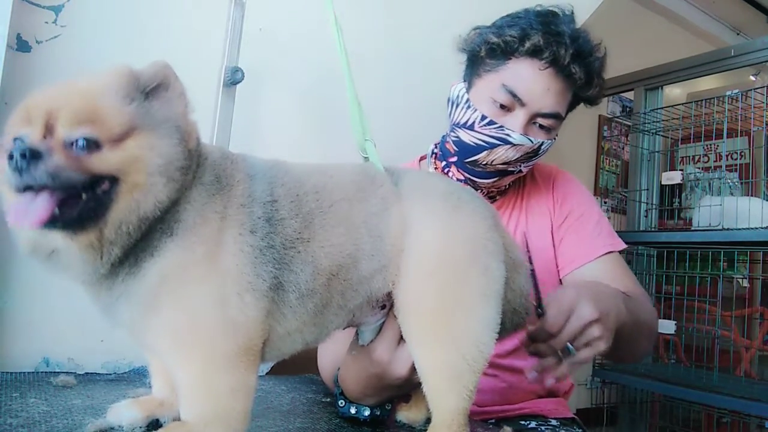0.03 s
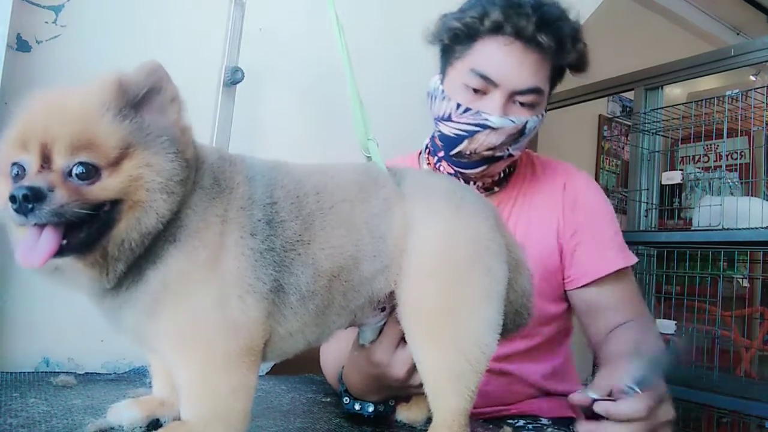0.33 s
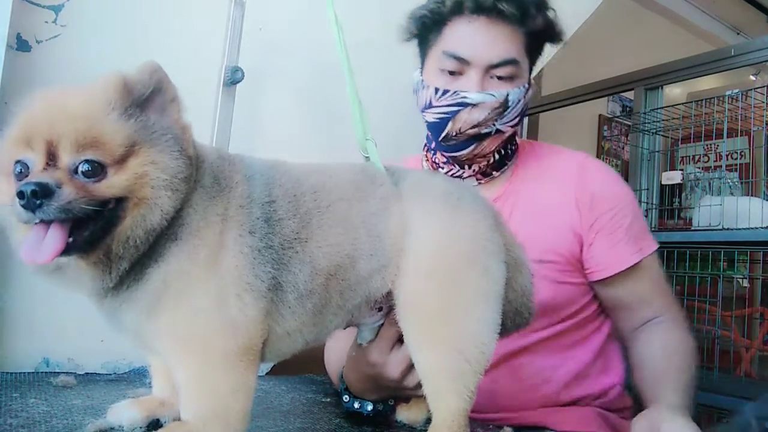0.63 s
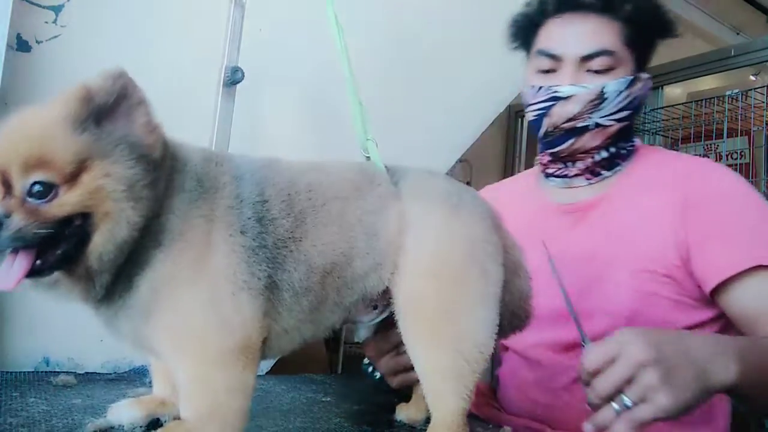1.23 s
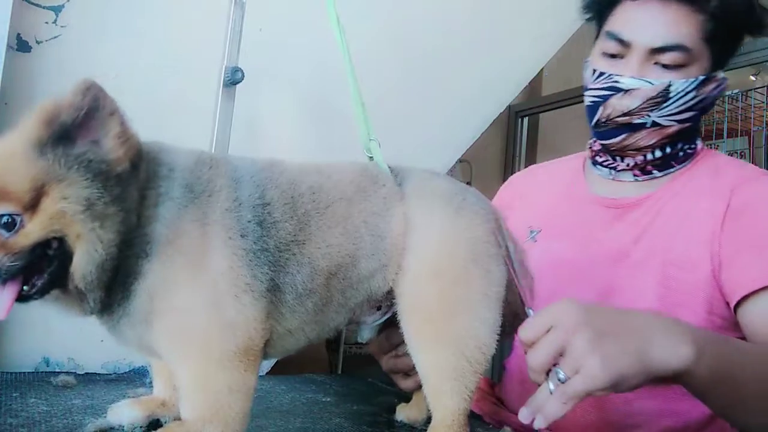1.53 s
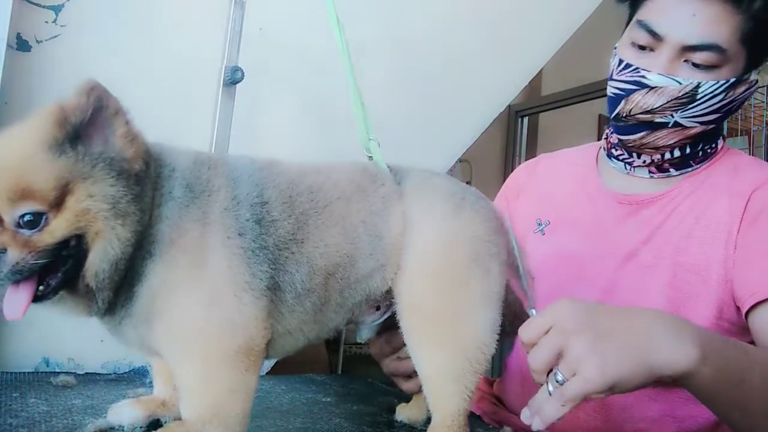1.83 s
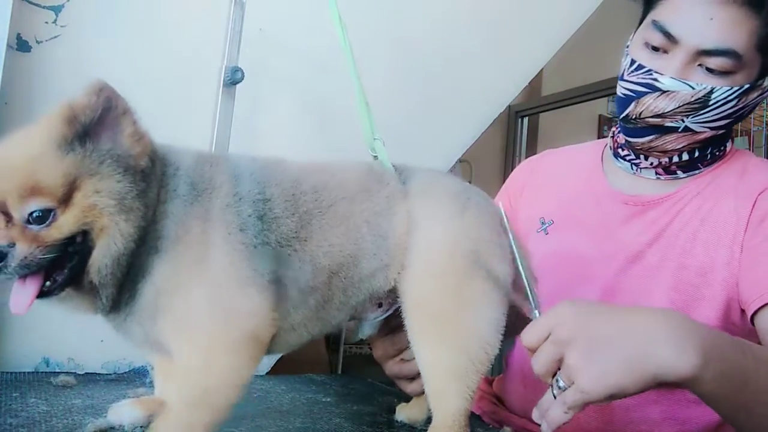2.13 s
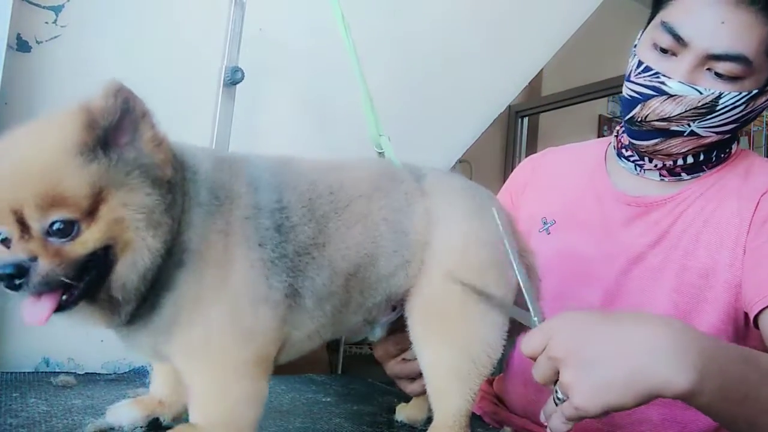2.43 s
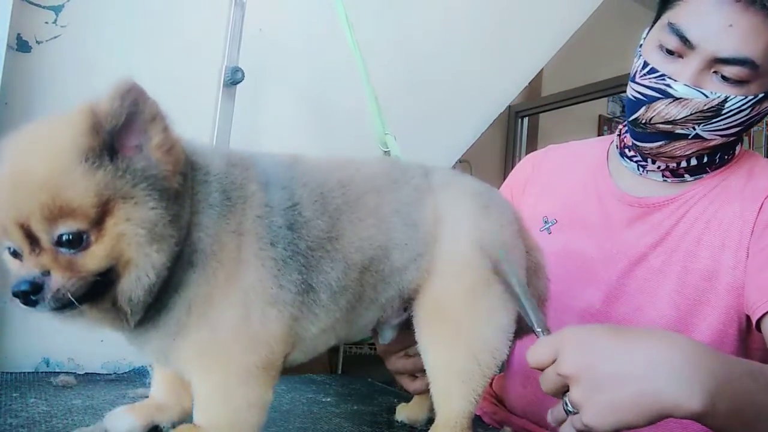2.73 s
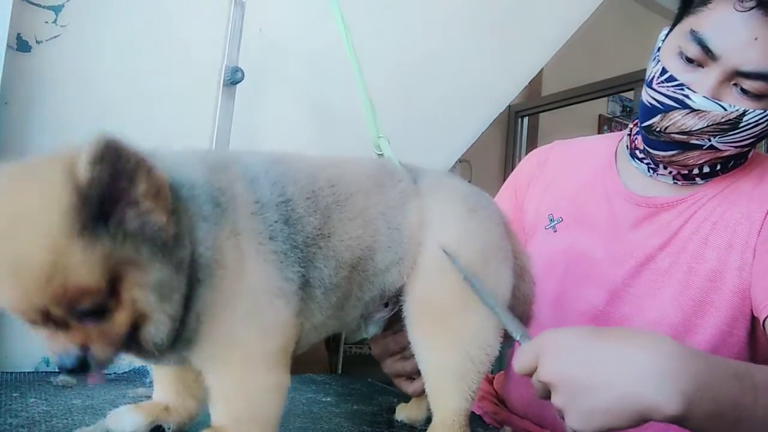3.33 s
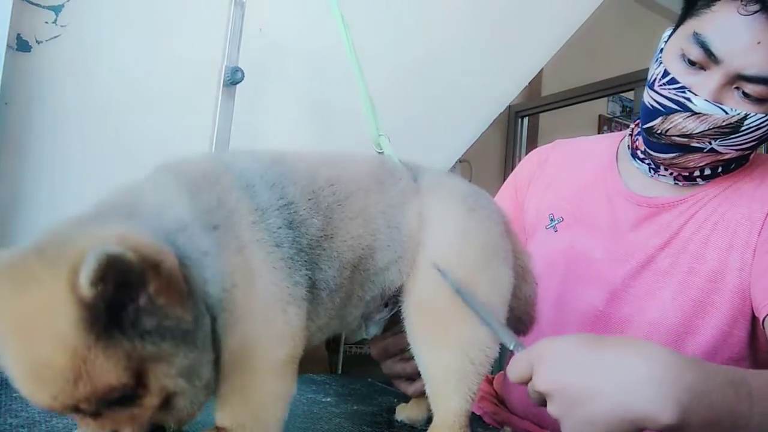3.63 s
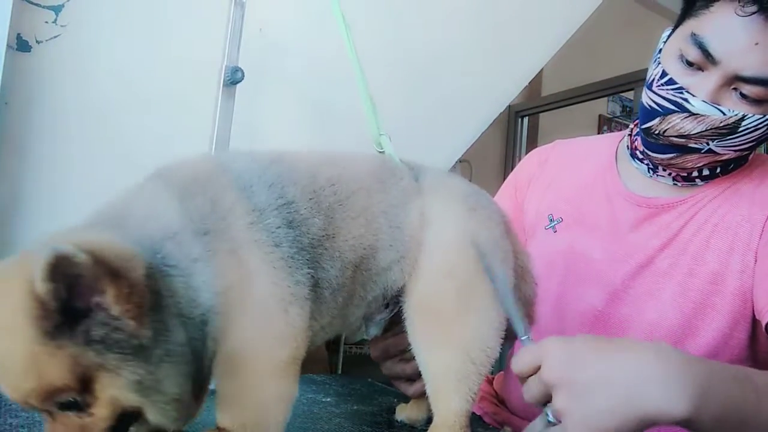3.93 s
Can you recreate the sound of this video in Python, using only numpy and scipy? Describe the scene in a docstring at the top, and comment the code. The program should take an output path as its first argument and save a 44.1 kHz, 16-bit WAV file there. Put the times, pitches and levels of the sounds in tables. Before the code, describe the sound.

Small steel scissors trim a dog's fur in a quiet room, with four brisk snips in the first 0.8 seconds. A faint far whine follows, then a dry tap at about 1 second. From 1.7 seconds to the end at 4, the blades scrape open and shut about three times a second, some cuts ending in a clack. Soft hiss and a distant, slowly rising motor drone lie underneath.

```python
"""A quiet room: small steel scissors trim a dog's coat, about three cuts a second.
The blades scrape along each other, rising in pitch as they close and falling as they open;
brisk cuts end in a clack. Behind them: steady room noise, a soft hiss, faint hums and the drone
of a distant motor slowly speeding up. A far whine and a dry tap are each heard once."""
import sys
import numpy as np
from scipy import signal
from scipy.fft import rfft, irfft
from scipy.io import wavfile
from scipy.ndimage import uniform_filter1d

SR = 44100
rng = np.random.default_rng(int(sys.argv[2]) if len(sys.argv) > 2 else 0)


def file_out(sig):
    """Save sig as 16-bit WAV at sys.argv[1]."""
    # one column per channel
    cols = np.atleast_2d(sig).T
    # limit, then scale
    lim = np.clip(cols, -1, 1)
    pcm = np.round(lim * 32767).astype(np.int16)
    wavfile.write(sys.argv[1], SR, pcm)


N = 176400


def amp(db):
    """Decibels to gain."""
    return 10 ** (np.asarray(db) / 20)


def unit(x):
    """Scale to rms 1."""
    return x / np.sqrt(np.mean(x ** 2) + 1e-20)


def read(points, hz):
    """Interpolate on a log-frequency axis."""
    f, value = np.transpose(points)
    return np.interp(np.log(hz + 1), np.log(np.sort(f)), value)


def add(mix, start_s, sound):
    """Mix a sound in at start_s."""
    part = mix[max(round(start_s * SR), 0):][:len(sound)]
    part += sound[:len(part)]


def drift(t, max_rate):
    """Smooth random wander along t, rms about 1."""
    rates = max_rate * np.geomspace(.1, 1, 20)
    return np.sin(2 * np.pi * (rates * t[:, None] + rng.random(20))).sum(1) / np.sqrt(10)


def patches(shape, bins, frames):
    """Random field of rms 1, smoothed over frequency and time."""
    field = uniform_filter1d(rng.standard_normal(shape), size=bins, axis=0)
    return unit(uniform_filter1d(field, size=frames, axis=1))


def colour(x, spectrum, ripple_db=0):
    """Minimum-phase filter of unit energy, with optional random ripple."""
    hz = np.fft.rfftfreq(2048, 1 / SR)
    gain = amp(read(spectrum, hz) + ripple_db * drift(hz, 1 / 700))
    cepstrum = irfft(np.log(gain))
    cepstrum[1:len(hz) - 1] *= 2
    cepstrum[len(hz):] = 0
    taps = irfft(np.exp(rfft(cepstrum)))
    return signal.fftconvolve(x, taps / np.linalg.norm(taps))[:len(x)]


def motor():
    """A distant motor gathers speed; three orders follow its rotation."""
    # run-up (time [s], rotation [Hz], level [dB])
    run_up = [(0.0, 75.6, -39.5), (0.28, 77.36, -47.5), (0.44, 79.1, -40), (0.86, 78.97, -49),
              (1.43, 80.1, -42), (2.08, 81.9, -48.5), (2.23, 84.1, -40.5), (3.05, 84.3, -35.5),
              (3.21, 86.8, -50), (3.36, 87.1, -44.5), (3.88, 89.5, -43), (4.0, 93.2, -63)]
    t = np.arange(N) / SR
    times_s, hz, level_db = np.transpose(run_up)
    turns = np.cumsum(np.interp(t, times_s, hz)) / SR
    drone = sum(amp(db) * np.sin(2 * np.pi * order * turns)
                for order, db in [(1, 0.5), (1.5, -15.5), (2, -9)])
    return amp(2 + np.interp(t, times_s, level_db)) * drone


def hums():
    """Faint tones wavering in level and phase."""
    # hums (frequency [Hz], level [dB])
    tones = [(177, -51), (193, -49.5), (297, -61.5), (357, -59.5), (384, -62), (769, -66.5)]
    t = np.arange(N) / SR
    waver_db, waver_rad = 2.7, 0.59
    return sum(amp(db + waver_db * drift(t, 5)) * np.sin(2 * np.pi * hz * t + waver_rad * drift(t, 5))
               for hz, db in tones)


def air():
    """Steady, mostly low room noise with a slight flicker."""
    # noise spectrum (frequency [Hz], relative density [dB])
    spectrum = [(20, -5.5), (35, -7), (55, -3), (80, -2), (120, 1.5), (150, -4), (180, -3.5), (225, -10.5),
                (300, -15.5), (420, -17), (500, -23), (700, -22.5), (850, -19), (1200, -18.5),
                (1550, -23.5), (2000, -22.5), (3000, -29.5), (4500, -35.5), (6000, -38), (7800, -30.5),
                (10000, -44.5), (16000, -41)]
    level_db, flicker_db = -41, 1.05
    hz, _, z = signal.stft(rng.standard_normal(N), SR, nperseg=4096, noverlap=3072)
    z = z * amp(read(spectrum, hz)[:, None] + flicker_db * patches(z.shape, bins=12, frames=5))
    noise = signal.istft(z, SR, nperseg=4096, noverlap=3072)[1][:N]
    return amp(level_db) * unit(noise)


def hiss():
    """A soft hiss that drops after a second, then partly returns."""
    # envelope (time [s], level [dB])
    envelope = [(0, -52.5), (.5, -51.5), (.9, -51.5), (1.15, -60), (1.6, -63), (4, -57)]
    # hiss spectrum (frequency [Hz], level [dB])
    spectrum = [(200, -13), (1000, 7), (3000, -5.5), (6000, -13), (7800, -2.5), (9500, -17), (16000, -6)]
    level_db = np.interp(np.arange(N) / SR, *np.transpose(envelope))
    return colour(rng.standard_normal(N), spectrum) * amp(level_db)


def scrape(t, force, contact, body_db=0):
    """Friction rings the blades unevenly; a peak follows the contact point (0 pivot, 1 tips)."""
    # blade resonances (frequency [Hz], level [dB])
    blades = [(300, -47), (2000, -31.5), (4000, -18), (5000, -21), (5450, -10), (5800, -16), (6250, -5.5),
              (6880, -17.5), (7350, -4.5), (8000, -2), (8900, -13.5), (9350, -9), (9750, -17), (10200, -3),
              (10700, -12.5), (11100, -5.5), (11500, -15), (12600, -4), (13100, -4), (13600, 5),
              (14050, -4), (14450, 5.5), (14900, 2), (15700, 6)]
    pivot_hz, tips_hz, glide_width_hz, glide_db = 6500, 15600, 2500, 5
    attack_s, grip_db, flicker_db = 0.0019, 1.6, 5.5
    body_hz = 10510  # lower modes lie below
    hz, times_s, z = signal.stft(rng.standard_normal(len(t)), SR, nperseg=256, noverlap=192)
    pitch_hz = pivot_hz + (tips_hz - pivot_hz) * np.interp(times_s, t, contact)
    rough_db = flicker_db * patches(z.shape, bins=3, frames=6)
    steel_db = read(blades, hz) + grip_db * drift(hz, 1 / 900) + body_db / (1 + (hz / body_hz) ** 10)
    peak_db = glide_db * np.exp(-((hz[:, None] - pitch_hz) / glide_width_hz) ** 2)
    z = z * amp(steel_db[:, None] + peak_db + rough_db)
    ring = signal.istft(z, SR, nperseg=256, noverlap=192)[1][:len(t)]
    running_rms = np.sqrt(uniform_filter1d(ring ** 2, size=400) + 1e-12)
    return np.minimum(t / attack_s, 1) * force * ring / running_rms


def clack(t, bright_db, body_db, handles_db):
    """A short chatter of steel on steel rings blades and handles."""
    # bright blade ring (frequency [Hz], level [dB])
    bright = [(300, -45), (8000, -30), (11500, -23), (12600, -14), (13500, -5), (14450, 3), (15200, 5),
              (16000, -9)]
    # lower blade ring (frequency [Hz], level [dB])
    body = [(300, -31), (5000, -37), (6800, -18.5), (7400, -8.5), (8300, 0), (8800, -1), (9400, -4.5),
            (9900, -12), (10250, -1), (10700, 0), (11200, -12), (16000, -27)]
    # handles knocking together (frequency [Hz], level [dB])
    handles = [(300, -3), (1500, -22), (2600, -4.5), (3600, -12), (4300, -6.5), (5200, -23), (7000, -29),
               (16000, -31)]
    rise_s = 0.0017
    blow = t / rise_s * np.exp(1 - t / rise_s)
    ring = sum(amp(db) * unit(colour(rng.standard_normal(len(t)) * blow, spectrum, ripple_db=1.5))
               for db, spectrum in [(bright_db, bright), (body_db, body), (handles_db, handles)])
    return amp(-4) * np.sqrt(np.mean(blow ** 2)) * ring


def scissors():
    """Closing blades touch, then bite towards the tips; opening ones rub back to the pivot."""
    # closing strokes (start [s], length [s], touch [dB], bite [dB], lower modes [dB])
    closes = [(0.048, 0.036, -40.5, -34.5, 2), (0.325, .021, -37, -25, -2), (0.545, 0.019, -37, -29, -2),
              (0.709, 0.027, -38.5, -43, 0), (1.690, 0.044, -41, -34, 3.5), (2.005, 0.047, -40, -38, 4.5),
              (2.311, 0.035, -35.5, -33.5, 1), (2.629, 0.018, -49, -42, 5), (2.701, 0.017, -52, -36, 7.5),
              (3.041, 0.05, -43.5, -34, 5), (3.339, 0.051, -44.5, -34.5, 0), (3.627, 0.049, -38, -36, -2),
              (3.871, 0.028, -33.5, -26, -1)]
    # opening strokes (start [s], length [s], first rub [dB], last rub [dB], lower modes [dB])
    opens = [(.190, 0.051, -41, -43.5, 3), (0.495, 0.0073, -43, -35, 0.5), (0.655, 0.018, -37.5, -42, 3),
             (1.322, 0.036, -43.5, -44.5, 1), (1.817, 0.041, -41, -39.5, 0.5),
             (2.124, .040, -34, -37.5, -2), (2.41, .019, -33, -32.5, -4.5), (2.777, 0.052, -37, -49, 6.5),
             (3.178, 0.04, -33.5, -45.5, 5), (3.501, 0.023, -31, -35.5, -1.5), (3.704, 0.012, -32, -30, -4),
             (3.792, 0.037, -36.5, -39, 0.5), (3.992, 0.036, -33, -43, 4)]
    # light touches of the loose blades (time [s], level [dB])
    touches = [(0.409, -36), (1.877, -41), (2.264, -41.5), (2.288, -44), (2.471, -38.5), (2.571, -43),
               (2.844, -40.5), (3.012, -39.5), (3.360, -34.5), (3.646, -35.5)]
    # blades snapping shut (time [s], bright ring [dB], lower ring [dB], handles [dB])
    clacks = [(.071, -35, -34.5, -61), (0.3372, -27, -24.5, -58), (.3445, -18.5, -28, -43),
              (0.557, -32, -35, -50), (0.565, -30, -39, -49), (.725, -43, -45, -53), (2.334, -34, -42, -56),
              (2.721, -32, -49, -58), (3.081, -25.5, -42, -72), (3.379, -37, -45, -60),
              (3.668, -37, -45, -55), (3.89, -25, -46.5, -54), (3.896, -31, -38, -42.5)]
    release_s, touch_s = 0.0051, 0.015
    out, t = np.zeros(N), np.arange(SR // 10) / SR

    def stroke(length_s):
        """Travel from 0 to 1, and the fade once it ends."""
        return np.minimum(t / length_s, 1), np.exp(-np.maximum(t - length_s, 0) / release_s)

    for start_s, length_s, touch_db, bite_db, body_db in closes:
        travel, release = stroke(length_s)
        force = amp(touch_db) * np.exp(-t / (2 * touch_s)) + amp(bite_db) * travel ** 2.56
        add(out, start_s, scrape(t, release * force, travel, body_db))
    for start_s, length_s, first_db, last_db, body_db in opens:
        travel, release = stroke(length_s)
        force = amp(first_db + (last_db - first_db) * travel)
        add(out, start_s, scrape(t, release * force, 1 - travel, body_db))
    for start_s, db in touches:
        add(out, start_s, scrape(t, amp(db) * np.exp(-t / touch_s), contact=np.zeros(len(t))))
    for start_s, *levels_db in clacks:
        add(out, start_s, clack(t, *levels_db))
    return out


def whine():
    """A faint, unsteady far tone that rises a little."""
    # glide (time [s], frequency [Hz], level [dB])
    glide = [(.68, 544, -73), (.76, 555, -56), (.84, 572, -58), (.89, 599, -54), (.95, 620, -75)]
    t = np.arange(N) / SR
    times_s, hz, db = np.transpose(glide)
    level = np.interp(t, times_s, amp(db), left=0, right=0)
    phase = 2 * np.pi * np.cumsum(np.interp(t, times_s, hz)) / SR
    return level * np.sin(phase + .8 * drift(t, 29.4))


def tap():
    """One dry tap on a small hard object being handled."""
    # object resonances (frequency [Hz], level [dB])
    resonances = [(200, -12), (1200, -12), (1900, -6), (2200, 6), (2480, -13), (2650, 0), (2850, -2),
                  (3200, -4), (3900, -7), (4450, -8), (5000, -18), (5650, -11), (6500, -26), (16000, -38)]
    start_s, level_db, decay_s = 1.031, -35, 0.0032
    out, t = np.zeros(N), np.arange(SR // 10) / SR
    burst = rng.standard_normal(len(t)) * np.exp(-t / decay_s)
    add(out, start_s, amp(level_db) * colour(burst, resonances))
    return out


def room(x):
    """Direct sound, hard reflections and a diffuse tail whose colour slowly shifts."""
    # first reflections (delay [s], level [dB])
    echoes = [(.0045, -11.5), (.0205, -20), (.034, -13.5)]
    # decay (frequency [Hz], T60 [s])
    decay = [(500, 0.4), (4000, 0.37), (8000, 0.4), (16000, 0.29)]
    tail_db, gap_s, crossfade_per_s = -5.5, .006, 0.87
    out = x.copy()
    for delay_s, db in echoes:
        add(out, delay_s, amp(db) * x)
    for k in range(3):  # three tails, crossfaded at constant power
        hz, t, z = signal.stft(rng.standard_normal(SR), SR, nperseg=256)
        tail = signal.istft(z * amp(-60 * t / read(decay, hz)[:, None]), SR)[1]
        share = np.sqrt(2 / 3) * np.cos(np.pi * (crossfade_per_s * np.arange(N) / SR + k / 3))
        add(out, gap_s, amp(tail_db) * signal.fftconvolve(x * share, tail / np.linalg.norm(tail)))
    return out


def scene():
    """Scissors and tap in the room, over the background; mono."""
    near = room(amp(3.5) * scissors() + tap())
    return (near + motor() + hums() + whine() + air() + hiss())[None]


def record(dry):
    """Steep low-pass band limit."""
    cutoff_hz = 15850
    taps = signal.firwin(611, cutoff_hz, window=("kaiser", 8), fs=SR)
    return signal.oaconvolve(dry, taps[None], "same")


dry = scene()
out = record(dry)
file_out(out)
```